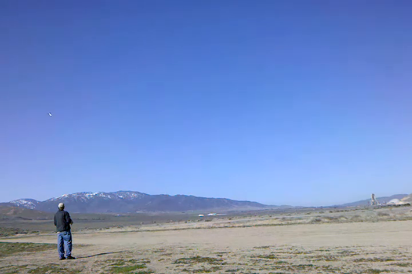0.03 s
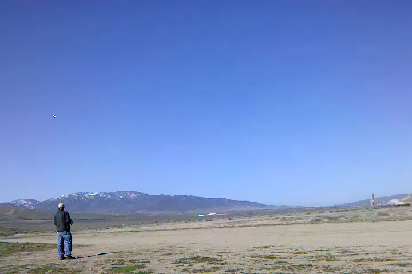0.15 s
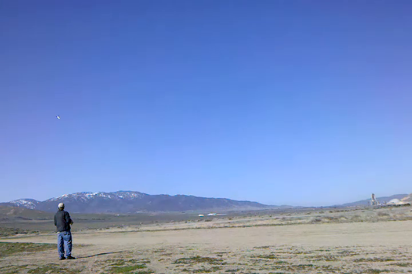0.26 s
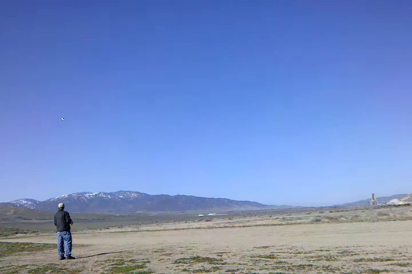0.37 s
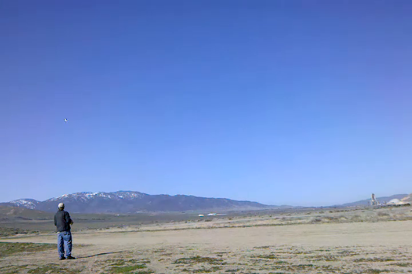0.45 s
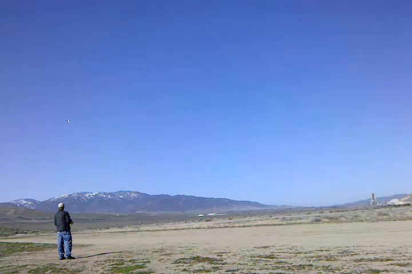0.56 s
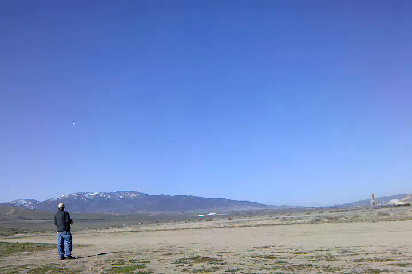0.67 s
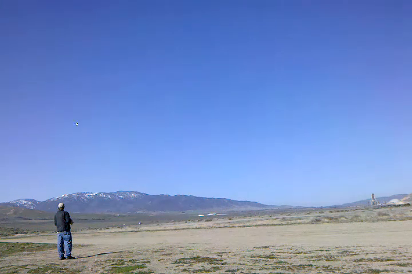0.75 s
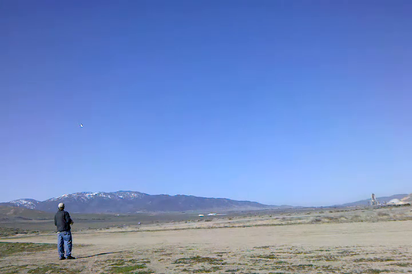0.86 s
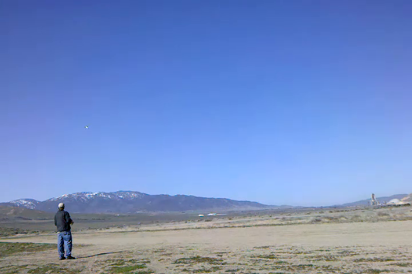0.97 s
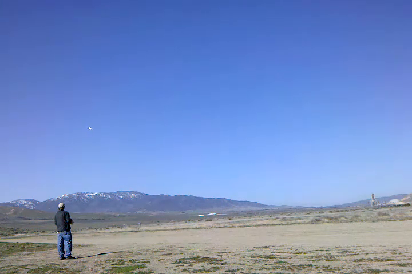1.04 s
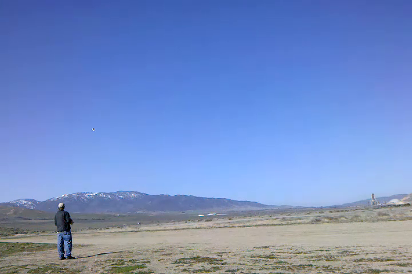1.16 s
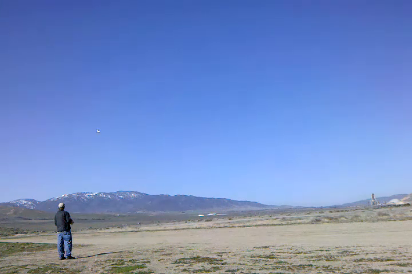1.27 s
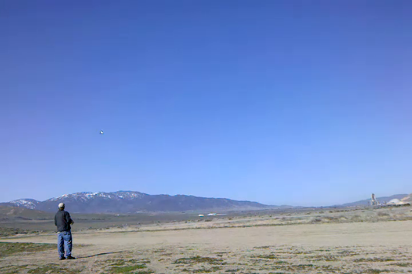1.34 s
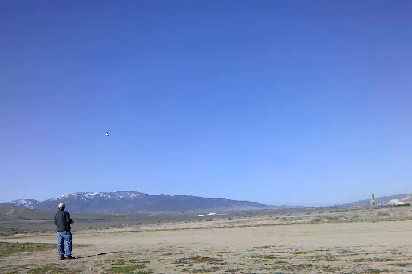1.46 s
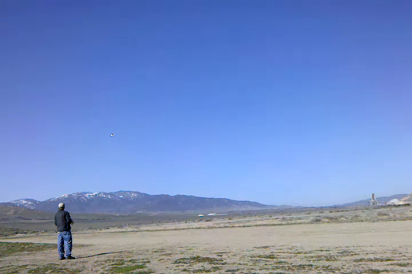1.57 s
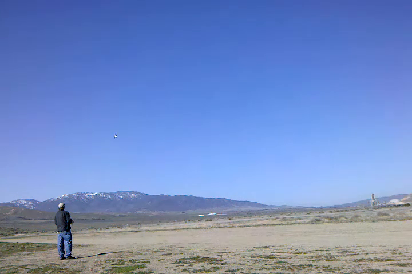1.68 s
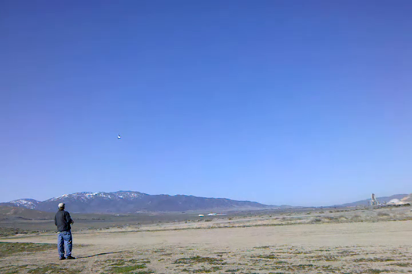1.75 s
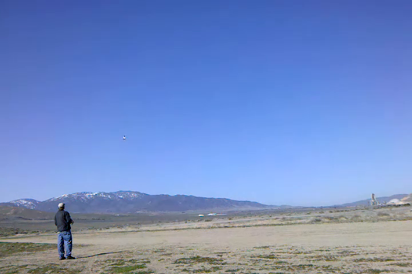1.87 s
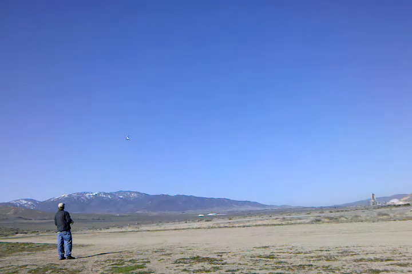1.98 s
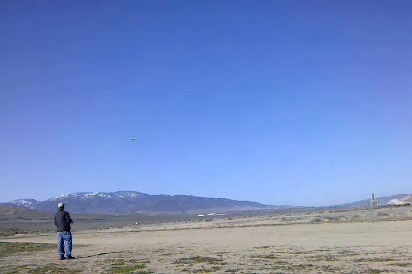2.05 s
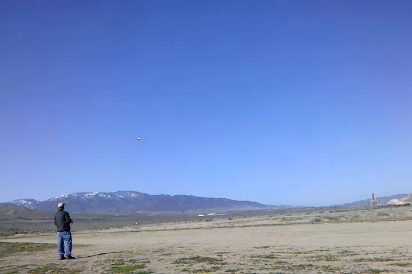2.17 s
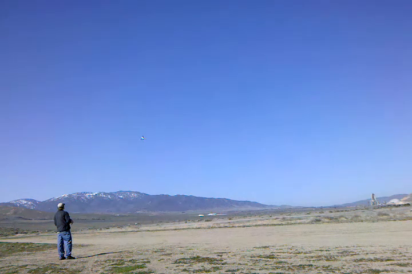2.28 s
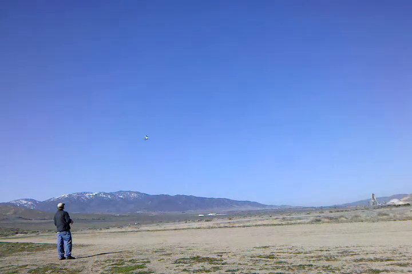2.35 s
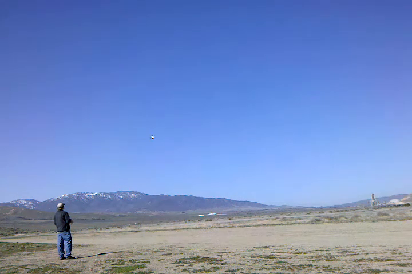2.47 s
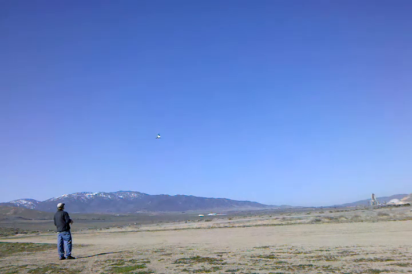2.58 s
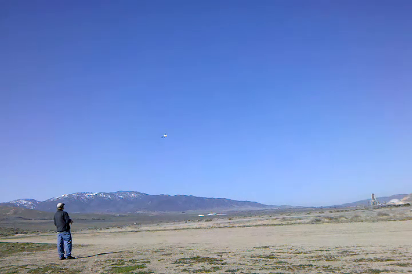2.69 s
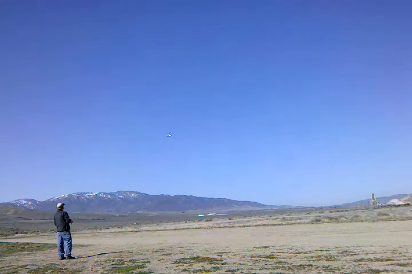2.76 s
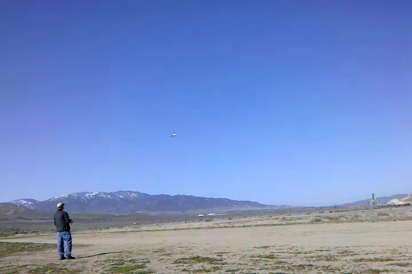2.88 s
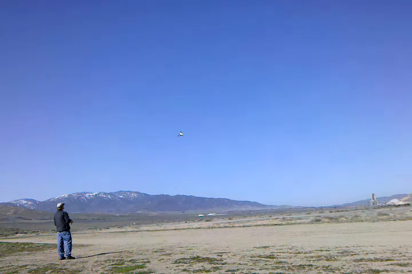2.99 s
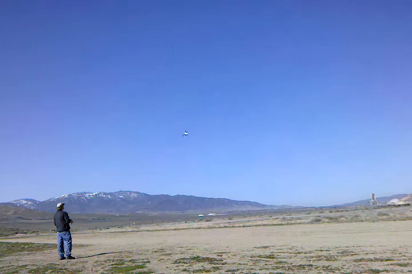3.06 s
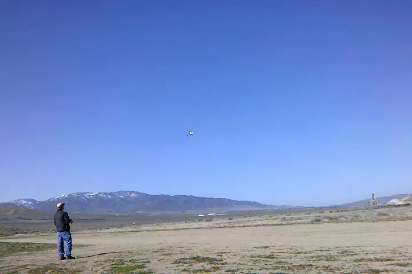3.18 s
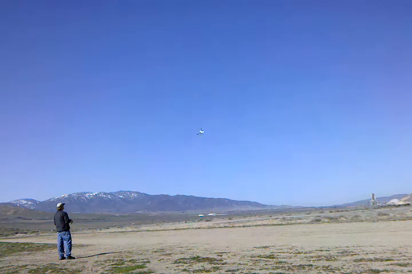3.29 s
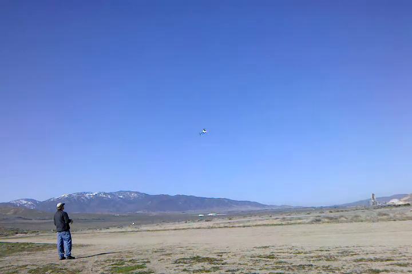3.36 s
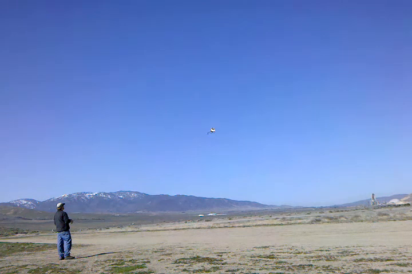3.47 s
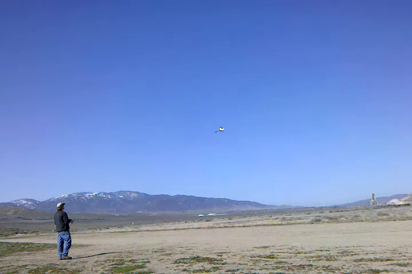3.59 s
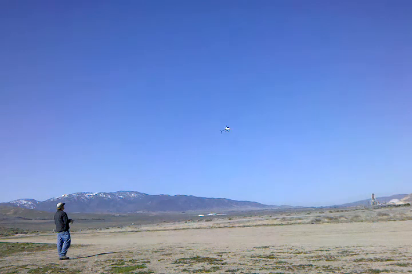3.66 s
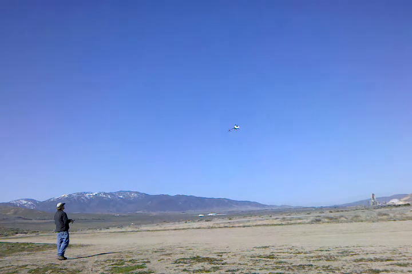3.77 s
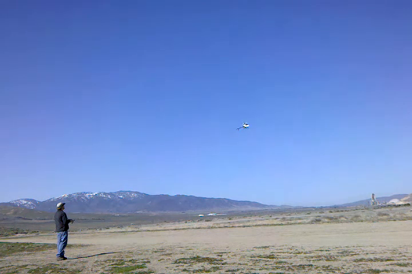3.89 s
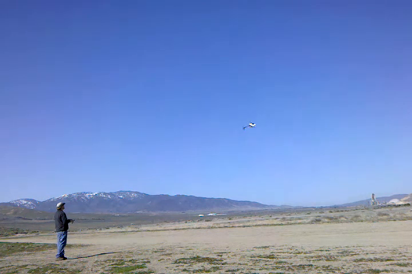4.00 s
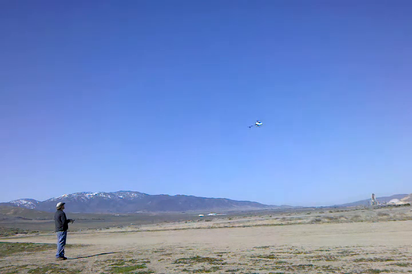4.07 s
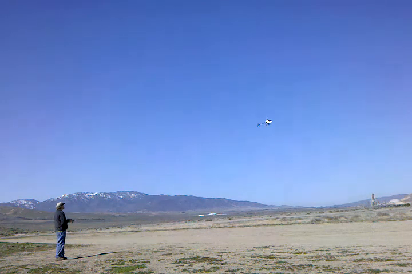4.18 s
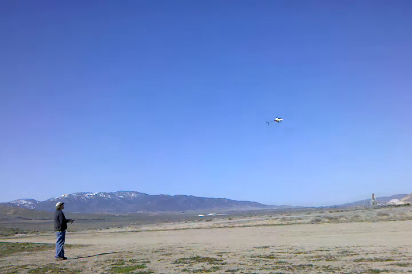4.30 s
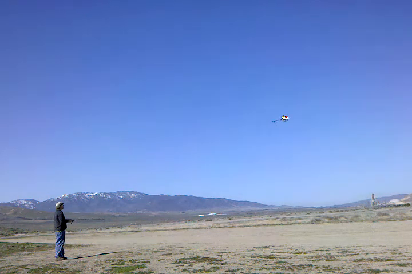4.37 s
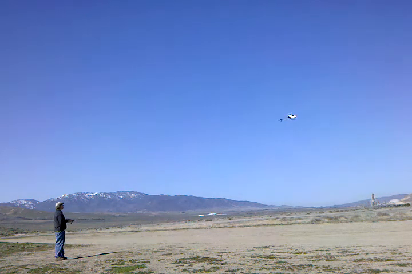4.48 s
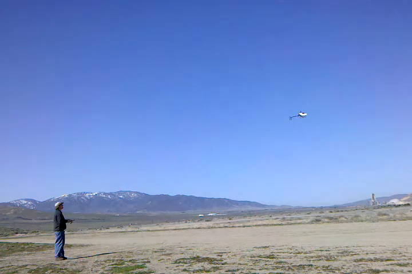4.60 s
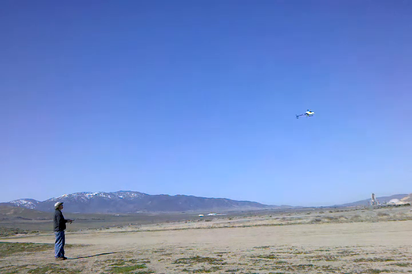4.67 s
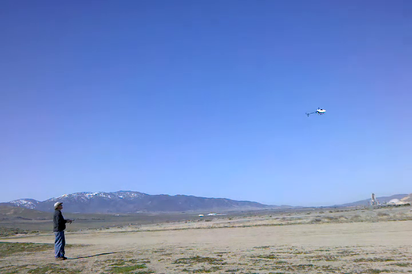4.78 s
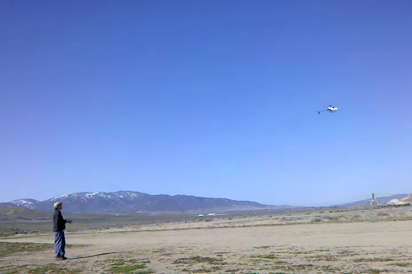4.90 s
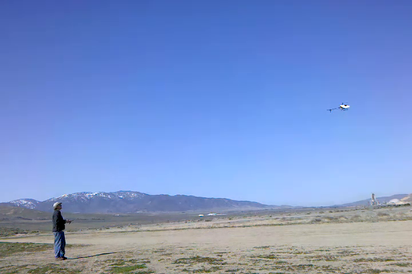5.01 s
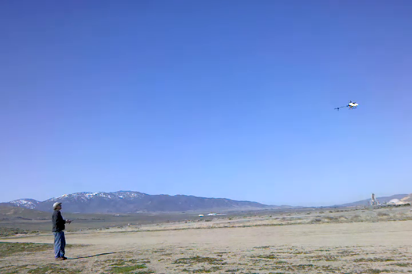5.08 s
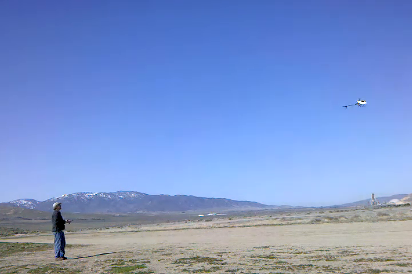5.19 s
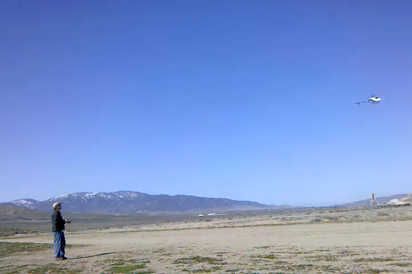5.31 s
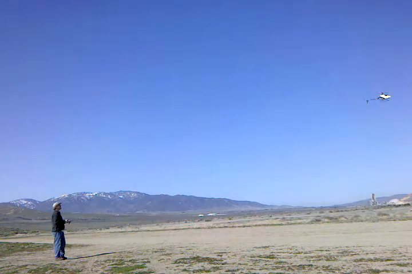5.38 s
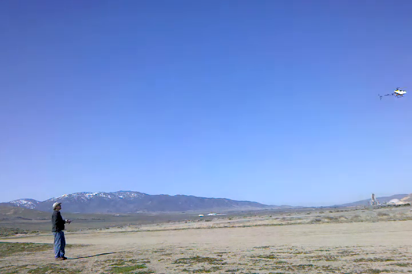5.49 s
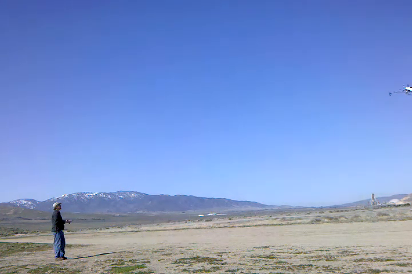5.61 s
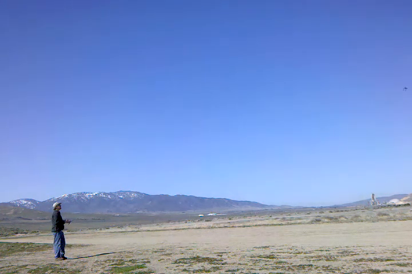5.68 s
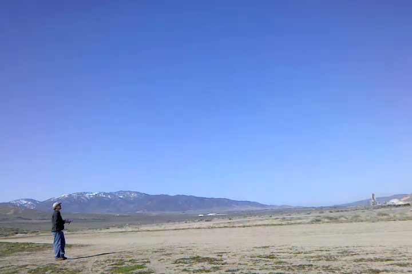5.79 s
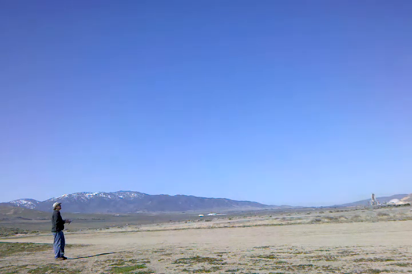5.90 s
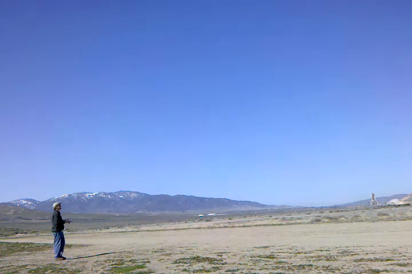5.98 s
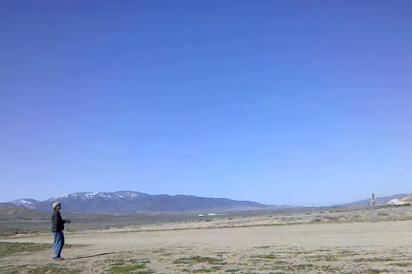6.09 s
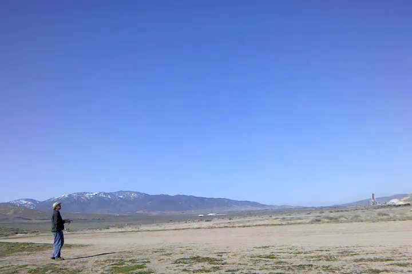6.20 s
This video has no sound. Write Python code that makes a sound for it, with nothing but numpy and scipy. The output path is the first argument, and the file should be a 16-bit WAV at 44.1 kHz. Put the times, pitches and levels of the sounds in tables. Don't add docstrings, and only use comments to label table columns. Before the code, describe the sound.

A small radio-controlled helicopter approaches outdoors, its buzzing motor chord and rapid blade chop joined by rising gear whine and airy hiss.

```python
import sys
import numpy as np
from scipy import signal
from scipy.fft import rfft, irfft, next_fast_len
from scipy.io import wavfile
from scipy.ndimage import uniform_filter1d, map_coordinates

SR = 44100
rng = np.random.default_rng(int(sys.argv[2]) if len(sys.argv) > 2 else 0)


def amplitude_ratio(level_db):
    exponent = np.asarray(level_db, float) / 20
    return 10 ** exponent


def waveform_to_disk(signal):
    frames = np.transpose(np.atleast_2d(signal))
    scaled = np.clip(frames, -1, 1) * 32767
    samples = np.round(scaled).astype(np.int16)
    wavfile.write(sys.argv[1], SR, samples)


N = 275625

# (time [s], speed [turns/s])
ROTOR_SPEED = [(0, 27.213), (.25, 27.332), (.75, 28.045), (1.25, 28.841), (1.5, 29.112), (1.75, 29.306),
               (2, 29.36), (2.25, 29.334), (2.75, 29.2), (3.25, 29.041), (3.75, 28.93), (4, 28.805),
               (4.5, 28.424), (5, 28.266), (5.75, 27.874), (6.25, 27.494)]
# (time [s], nearness [dB], how far the open flank faces us [dB])
FLIGHT = [(0, 2, -2.5), (.5, 0, 0), (.8, -1, 2), (1, -2, 0.5), (1.25, -1, 3), (2, 1.5, -1), (2.5, 3, -1),
          (3, 6, -1.5), (3.4, 9, 3.5), (3.7, 11.5, 4), (4, 13.5, 5.5), (4.5, 13, 13.5), (5, 13.5, 16.5),
          (5.3, 16, 20), (5.6, 18, 20.5), (5.9, 20, 23), (6.25, 22, 24.5)]
# (time [s], thump [dB], snap over thump [dB])
SLAP_STRENGTH = [(0, -57.5, -12), (.2, -66, -4), (.62, -69.5, 4), (.75, -62.5, -2.5), (1, -63.5, -10),
                 (1.2, -72, -7), (1.38, -64, -9), (1.88, -64.5, -14.5), (2.1, -52, -27), (2.19, -44.5, -19),
                 (2.73, -47, -10), (3, -54.5, -10.5), (3.25, -49, -7.5), (4.05, -53, -2.5),
                 (4.5, -67, -15.5), (5, -75, -16), (5.88, -56.5, -3.5), (6.25, -68, -1)]
# (time [s], angle [turns])
WAKE_ANGLE = [(0, .049), (1, -.035), (2, -.066), (4.2, .05), (5.3, .06), (6.25, .175)]
# (time [s], half length [s], level [dB])
ODD_PASSES = [
    (2.521, .011, -9),
    (2.162, .009, 4),
    (2.66, .07, 1.5),
    (.91, .06, 2.5),
]
# (time [s], extra level [dB])
SQUARE_HITS = [(.019, 5.5), (.744, 3), (.779, 2), (.832, 8), (.885, 4), (.919, 4), (.938, 6.5),
               (2.535, 4.5), (2.603, -0.5), (2.638, 0.5), (2.707, 3), (3.032, 6.5), (3.205, 4.5),
               (3.567, 3.5), (3.62, 4), (4.0, 3.5), (5.7, 4.5), (5.988, 5.5)]
# (frequency [Hz], width [Hz], level [dB])
BLADE_RING = [
    (652, 76, 3.5),
    (661, 87, 0),
]
# (multiple of rotor speed [1], level over thump [dB])
BLADE_MISMATCH = [(11, -23), (13, -29), (15, -27)]
# (frequency [Hz], level [dB per Hz])
CRACK_SPECTRUM = [(300, -44.5), (900, -8.5), (1700, 6.5), (2600, -5.5), (3500, -11), (6000, -41.5),
                  (9000, -56.5)]
# (frequency [Hz], level [dB per Hz])
SNAP_SPECTRUM = [(200, -26), (500, 1.5), (1000, 5), (2200, 6.5), (3200, -5), (6000, -43), (8000, -60.5)]
ROTOR_ORDERS = {"2": (-91, 0.41, [(118, 14, 12.5)]), "4": (-80, 0.071, [(48, 17, 5.5), (69.7, 6.6, 9.5),
                (119.1, 14.4, 19)]), "6": (-74.5, 0.24, [(0, 7.7, -26), (28, 13, -23.5), (67.7, 8, 5.5)]),
                "9": (-64, .01, [(0, 18, -7.5), (125.4, 8.2, -19)]), "18": (-72.5, .01, [(61, 7, -5),
                (99.8, 23.4, 19.5)]), "27": (-71, 0.77, [(6, 2.7, -12), (50, 15, 3.5), (84.4, 5, 4.5),
                (91, 1.9, -1.5)]), "36": (-71, .01, [(12.1, 7.2, 5.5), (37, 10, -11), (52.7, 6.6, 7),
                (81.5, 12, 5), (130, 6, 9)]), "54": (-80, 0.57, [(100, 13, 11)])}
DRIVE_ORDERS = {"31.5": (-87.5, 0.3, [(30.2, 29, 17)]), "40.5": (-74, 0.87, [(2, 8, -16), (53, 5.7, 3.5),
                (63, 4.9, -2.5), (109.5, 6, -15.5)]), "81": (-63, 0.0054, [(58, 9.6, -15.5),
                (116, 36, -12.5)]), "17": (-66, 0.57, [(2, 10.7, -11), (53.7, 3.3, 4.5), (75.4, 3.6, -14)]),
                "68": (-58.5, .01, [(5.1, 20.2, -14), (77, 7, 5), (98, 21, -2.5), (125.5, 4.5, 6)]),
                "136": (-77.5, 0.21, [(5, 50, -18), (79, 12, 8), (129, 6.3, 22)]),
                "180": (-88.5, 0.22, [(31.8, 12, 12), (83.6, 8, 16)])}
# (multiple of rotor speed [1], level [dB])
FAINT_ORDERS = [(8, -30), (14, -28.5), (24, -15.5), (34, -19.5), (45, -17.5), (85.5, -16.5), (102, -22),
                (112.5, -19), (117, -14.5), (121.5, -29.5), (126, -35), (153, -26.5), (204, -26.5),
                (206, -25.5)]
# (frequency [Hz], level [dB per Hz])
WASH_SPECTRUM = [(60, -25.5), (250, -18), (400, -7.5), (520, 3), (720, 2), (880, -9.5), (1150, 1.5),
                 (1600, -4.5), (2000, -1), (3000, -18.5), (5000, -68.5)]
# (frequency [Hz], level [dB per Hz])
SWISH_SPECTRUM = [(900, -46), (1800, -1.5), (2300, 0.5), (3200, -0.5), (4000, -2.5), (4700, -5),
                  (6500, -56)]
# (frequency [Hz], level [dB per Hz])
HISS_SPECTRUM = [(3000, -49.5), (4500, -7), (5300, 0.5), (6000, 1.5), (6500, -6), (7500, -45)]
# (frequency [Hz], level [dB per Hz])
TIP_SPECTRUM = [(5000, -53), (6200, -7), (6600, 2), (7000, 0.5), (7400, -4), (7900, -7), (8800, -8.5),
                (9300, -28.5)]
# (bearing [deg], half width [deg], level [dB])
TIP_BEAMS = [(59, 4.2, 0.5), (96.5, 14, -5.5)]
# (time [s], soil delay [ms], soil strength [0-1], body delay [ms], body strength [0-1])
SURFACE_ECHOES = [(0, 1.42, 0.04, 0.56, 0.13), (.8, 1.36, 0.2, .53, 0.35), (1.2, 1.36, 0.64, 0.53, 0.2),
                  (1.6, 1.35, 0.52, .3, 0), (2.3, 1.32, 0.51, 0.36, 0.08), (3, 1.264, 0.46, 0.4, 0.31),
                  (3.6, 1.236, 0.23, 0.4, 0.23), (4.1, 1.4, 0.23, 0.44, 0.4), (4.6, 1.16, 0, 0.47, 0.44),
                  (5.45, 1.034, 0.13, 0.5, 0.44), (5.62, 1, 0.2, 0.456, 0.1), (5.72, 1.58, .26, 0.35, 0.13),
                  (6.25, 1.6, .22, 0.35, 0.15)]
# (first delay [ms], last delay [ms], strength [0-1],
# lobes as (bearing [deg], half width [deg], level [dB]))
HOLDER_ECHO = (0.75, 0.549, 0.22, [(43.3, 18, 2), (116, 24, -8)])
ECHO_TURNS = (.75, .5, .5)
# (bearing [deg], half width [deg], level [dB])
MESH_BEAMS = [(18.7, 5.9, -7), (67, 4.4, 2), (118, 3.1, 2)]
# (bearing [deg], half width [deg], level [dB])
BEAT_MASKS = [(28, 10, -11), (73, 18, -13.5)]
# (bearing [deg], half width [deg], level [dB])
TEETH_MASK = [(46.7, 34, -12.5)]
# (distance from the mesh order [1], level [dB])
TOOTH_LINES = [(-8.5, -14.5), (-4.5, -10.5), (-4, -10), (-3.5, -16.5), (-1, -14), (4.5, -12.5), (7, -11.5),
               (7.5, -12), (6.5, -12.5)]
# (frequency [Hz], level [dB per Hz])
FIELD_SPECTRUM = [(15, -55), (25, -27), (103, -3.5), (198, -8), (246, -5), (302, -14), (434, -13.5),
                  (450, -13.5), (580, -32), (990, -120)]
# (time [s], half length [s], level [dB])
RUMBLE_GUSTS = [
    (3.38, 0.26, 4),
    (4, 0.65, 2.2),
    (5.67, 0.24, 6.7),
]
# (frequency [Hz], gain [dB])
MIC_RESPONSE = [(20, -30), (60, -6), (120, 0), (6600, 0), (7200, -7), (7800, -24), (8800, -28), (9400, -70)]


def unit(x):
    return x / np.sqrt(np.mean(x ** 2) + 1e-20)


def curves(rows):
    s, *columns = np.transpose(rows)
    return [np.interp(np.arange(N) / SR, s, column) for column in columns]


def lobes(rows, per_s=20):
    bearing = per_s * np.arange(N) / SR
    shape = 4.1
    return sum(db * np.exp(-abs((bearing - centre) / width) ** shape) for centre, width, db in rows)


def wobble(rate):
    knots = rng.standard_normal(int(N * rate / SR) + 4)
    return map_coordinates(knots, [np.arange(N) * rate / SR], order=1)


def filtered(x, response):
    size = next_fast_len(N + SR // 2)
    return irfft(rfft(x, size) * response(np.fft.rfftfreq(size, 1 / SR)), size)[..., :N]


def coloured(x, points):
    f, db = np.transpose(points)
    return filtered(x, lambda hz: amplitude_ratio(np.interp(np.log(hz + 1), np.log(f), db)))


def rush(points, patchy_db):
    z = signal.stft(rng.standard_normal(N), nperseg=512)[2]
    patches = uniform_filter1d(rng.standard_normal(z.shape), size=5, axis=0)
    patches = uniform_filter1d(patches, size=16, axis=1)
    noise = signal.istft(z * amplitude_ratio(patchy_db * unit(patches)), nperseg=512)[1][:N]
    return unit(coloured(noise, points))


def tone(turns, multiple, level_db, start=None):
    start = rng.uniform() if start is None else start
    level = amplitude_ratio(level_db + 0.37 * wobble(9.5) + 0.27 * wobble(30))
    phase = 2 * np.pi * (multiple * turns + start) + 0.23 * wobble(20)
    return np.sqrt(2) * level * np.cos(phase)


def slaps(passes):
    thump_db, snap_db = curves(SLAP_STRENGTH)
    thump_db = thump_db + lobes(ODD_PASSES, per_s=1)
    crack_db = -6.5 + 0.17 * curves(FLIGHT)[0] + 0.27 * snap_db

    at = np.flatnonzero(np.diff(np.floor(passes)) > 0)
    blade = np.floor(passes[at + 1]).astype(int) % 2
    timing, force, burst_luck, snap_luck = rng.standard_normal((4, len(at)))
    at = np.clip(at + np.round(0.00013 * SR * timing).astype(int), 0, N - 1)
    blows, bursts, drops = np.zeros((2, N)), np.zeros(N), np.zeros(N)
    blows[blade, at] = (1 - 2 * blade) * amplitude_ratio(0.5 * force)
    bursts[at] = amplitude_ratio(0.9 * force + 1.6 * burst_luck)
    drops[at] = -amplitude_ratio(2.8 * snap_luck)
    for s, extra_db in SQUARE_HITS:
        drops[at[np.argmin(abs(at - s * SR))]] = -amplitude_ratio(4.0 + extra_db)

    t = np.arange(SR // 40) / SR
    puff = (1 - np.exp(-t / 0.00034)) * np.exp(-t / 0.003)
    gate = signal.fftconvolve(bursts, puff)[:N]

    def ring(f):
        return np.array([amplitude_ratio(db) * 1j * f * np.sqrt(w) / (c * c - f * f + 1j * f * w)
                         for c, w, db in BLADE_RING])

    def hollow(f):
        return 0.2 + 1j * f * 500 / (690 ** 2 - f * f + 1j * f * 500)

    steady = filtered(blows, lambda f: ring(f) * hollow(f)).sum(axis=0)
    smear = filtered(gate * rng.standard_normal(N), lambda f: ring(f)[1] * f / (f + 400))
    thump = unit(unit(steady) + 0.38 * unit(smear))
    crack = unit(coloured(gate * rng.standard_normal(N), CRACK_SPECTRUM))
    snap = unit(coloured(drops, SNAP_SPECTRUM))
    mix = amplitude_ratio(thump_db - 3.5) * thump
    mix += amplitude_ratio(thump_db + np.minimum(crack_db, 2)) * crack
    mix += amplitude_ratio(thump_db + snap_db) * snap
    return mix + sum(tone(passes / 2, round(k), thump_db + db) for k, db in BLADE_MISMATCH)


def shafts(turns):
    near_db = curves(FLIGHT)[0]
    hum = np.zeros(N)
    for orders, start in ((ROTOR_ORDERS, 0), (DRIVE_ORDERS, 0.33)):
        for multiple, (db, share, beam) in orders.items():
            hum += tone(turns, float(multiple), db + share * near_db + lobes(beam), start)
    for multiple, db in FAINT_ORDERS:
        grows = 1 - multiple / 870
        hum += tone(turns, multiple, -62 + grows * near_db + db + 4.8 * wobble(1.395))
    return hum


def air(passes):
    near_db, flank_db = curves(FLIGHT)
    churn_db = curves(SLAP_STRENGTH)[0] - 8.5
    wash_db = 20 * np.log10(np.hypot(amplitude_ratio(-60 + 0.82 * near_db), amplitude_ratio(churn_db))) - 3.5
    swish_db = -66 + near_db
    hiss_db = -71 + flank_db
    tip_db = -77.5 + 1.09 * near_db + lobes(TIP_BEAMS)
    swell = np.cos(2 * np.pi * (passes - 0.15))
    gust = wobble(7)
    wash = amplitude_ratio(wash_db + 0.5 * gust + 1.7 * swell) * rush(WASH_SPECTRUM, patchy_db=1.6)
    swish = amplitude_ratio(swish_db + 0.1 * gust + 2.2 * swell) * rush(SWISH_SPECTRUM, patchy_db=1.5)
    hiss = amplitude_ratio(hiss_db + 0.37 * gust + 0.99 * swell) * rush(HISS_SPECTRUM, patchy_db=1.5)
    tips = amplitude_ratio(tip_db + 0.68 * gust + 2.8 * swell) * rush(TIP_SPECTRUM, patchy_db=0.5)
    return wash + swish + hiss + tips


def ground(x):
    hz, t, z = signal.stft(x, SR, nperseg=1024)
    at = np.clip((t * SR).astype(int), 0, N - 1)
    soil_ms, soil, body_ms, body = curves(SURFACE_ECHOES)
    first_ms, last_ms, strength, beam = HOLDER_ECHO
    holder_ms, holder = np.linspace(first_ms, last_ms, N), strength * amplitude_ratio(lobes(beam))
    paths = [(soil_ms, soil), (holder_ms, holder), (body_ms, body)]
    echoes = 0
    for (ms, gain), turn in zip(paths, ECHO_TURNS):
        cycles = hz[:, None] * ms[at] / 1000 + turn
        echoes = echoes + gain[at] * np.exp(-2j * np.pi * cycles)
    dulling = np.hypot(1, hz / 8000)[:, None]
    return signal.istft(z * (1 + echoes / dulling), SR, nperseg=1024)[1][:N]


def gear(turns):
    flank_db = curves(FLIGHT)[1]
    mesh_db = -72 + flank_db + lobes(MESH_BEAMS)
    beat_db = mesh_db + lobes(BEAT_MASKS)
    teeth_db = -70.5 + flank_db + lobes(TEETH_MASK)
    tight = 0.81
    whine = tone(turns, 170, mesh_db + 0.5, 0)
    whine += tone(turns, 171, beat_db + 1, -tight) + tone(turns, 169, beat_db - 7, tight)
    sides = sum(tone(turns, 170 + round(k), teeth_db + db + 1.5 * wobble(3)) for k, db in TOOTH_LINES)
    slow = filtered(rng.standard_normal((2, N)), lambda hz: 1 / (1 + (hz / 70) ** 2))
    mesh = 2 * np.pi * 170 * turns
    rasp = slow[0] * np.cos(mesh) + slow[1] * np.sin(mesh)
    rasp *= 1 + 0.9 * np.cos(2 * np.pi * (turns - tight))
    return whine + sides + amplitude_ratio(-79 + flank_db) * unit(rasp)


def open_field():
    return amplitude_ratio(-71.5 + lobes(RUMBLE_GUSTS, per_s=1)) * rush(FIELD_SPECTRUM, patchy_db=2.3)


def scene():
    turns = np.cumsum(curves(ROTOR_SPEED)[0]) / SR
    passes = 2 * (turns - curves(WAKE_ANGLE)[0])
    blades = ground(slaps(passes) + air(passes))
    return (blades + shafts(turns) + gear(turns) + open_field())[None]


def band_limit(x):
    return signal.sosfilt(signal.butter(12, 9000, fs=SR, output="sos"), x)


def record(dry):
    heard = coloured(dry, MIC_RESPONSE)
    return band_limit(heard)


dry = scene()
out = record(dry)
waveform_to_disk(out)
```